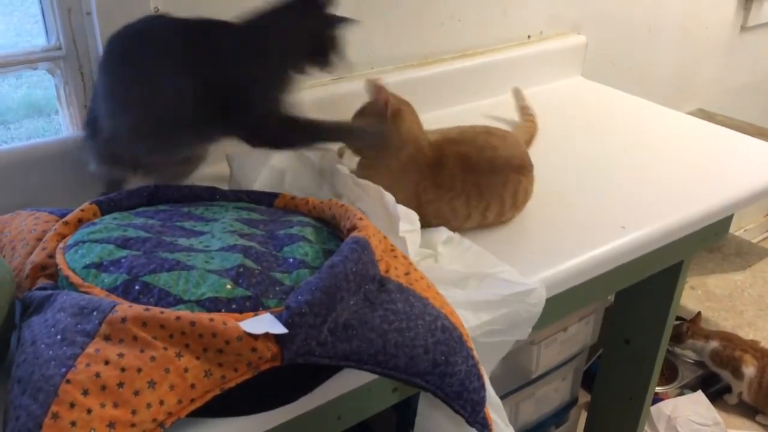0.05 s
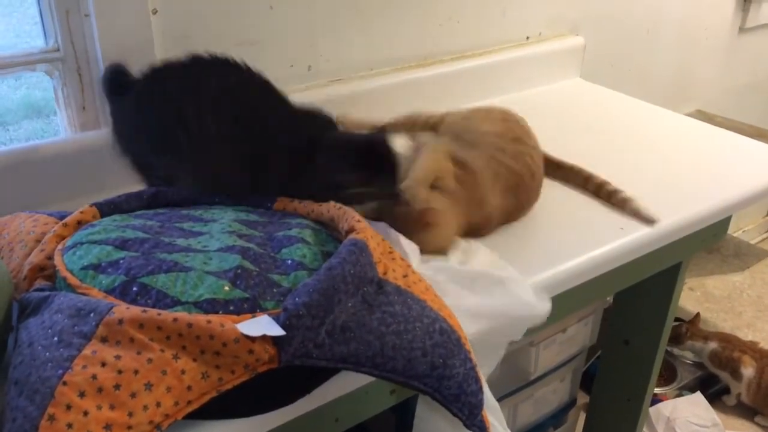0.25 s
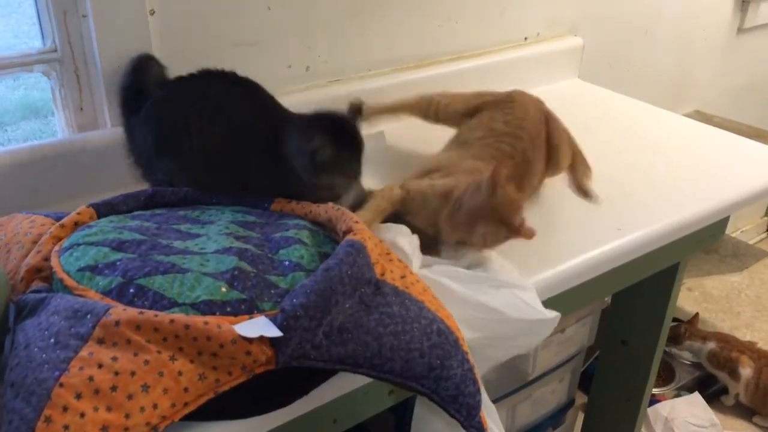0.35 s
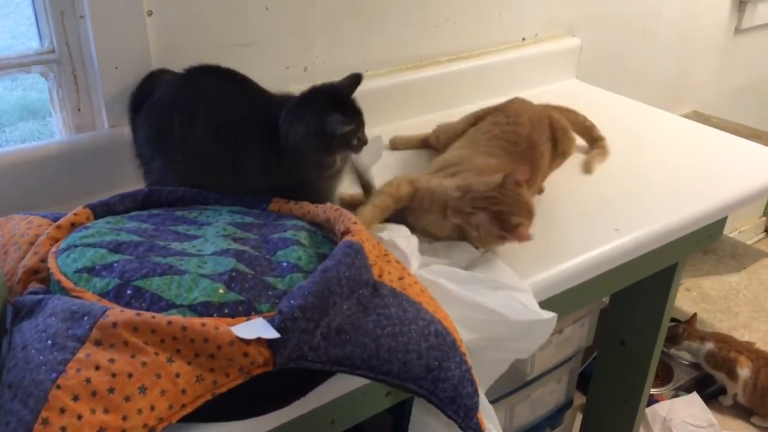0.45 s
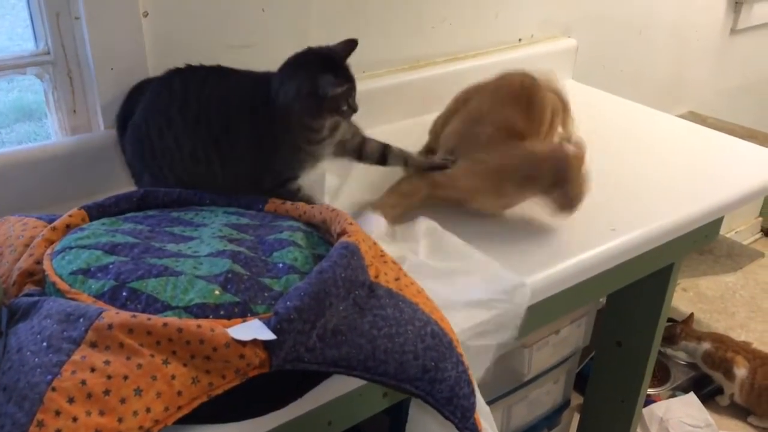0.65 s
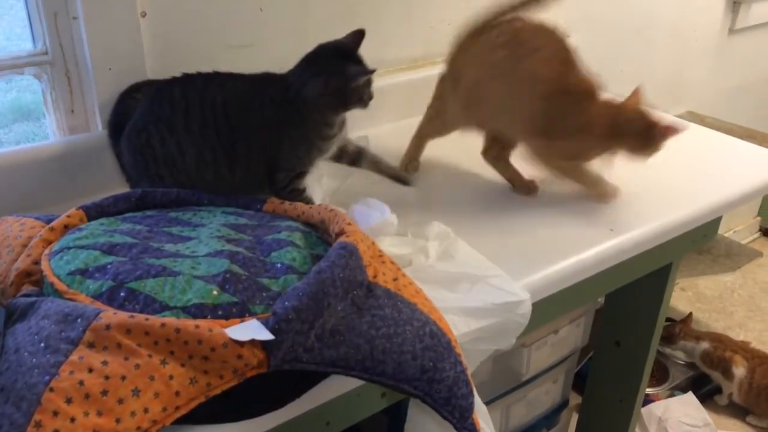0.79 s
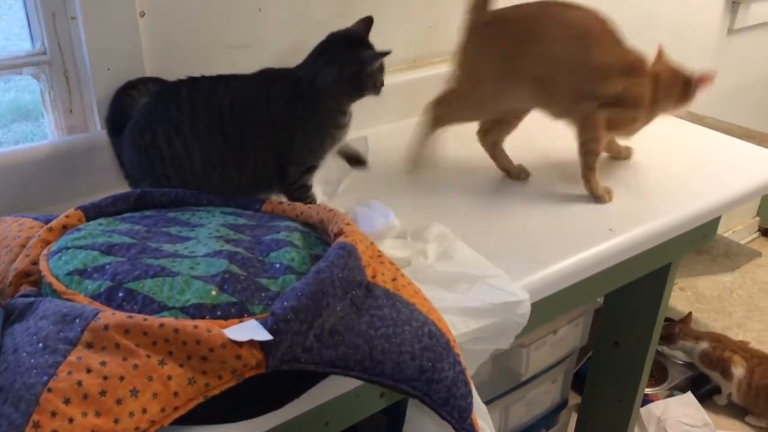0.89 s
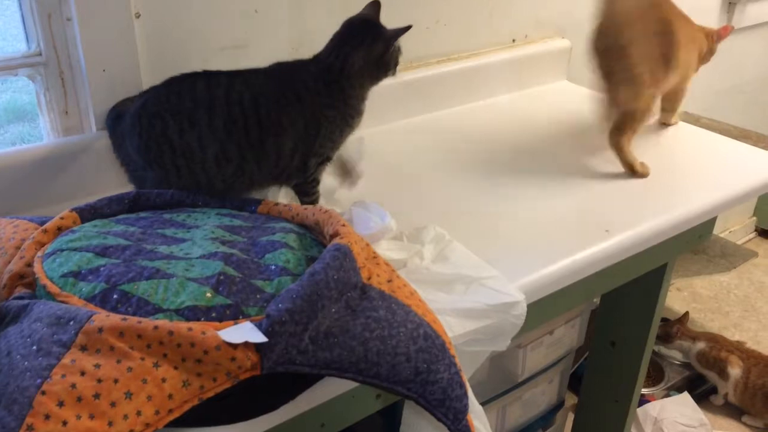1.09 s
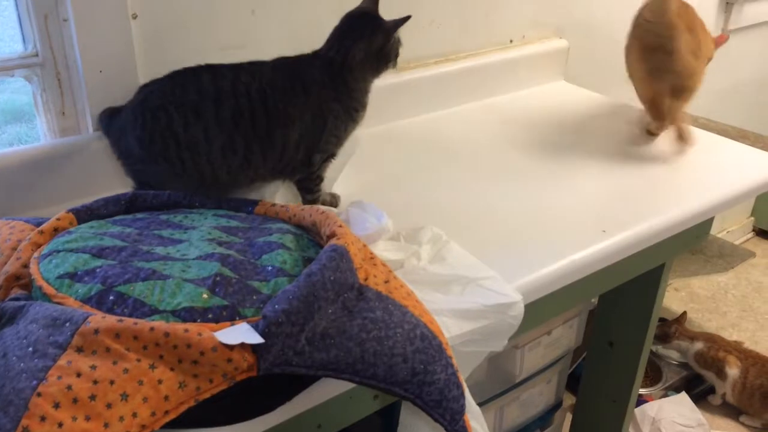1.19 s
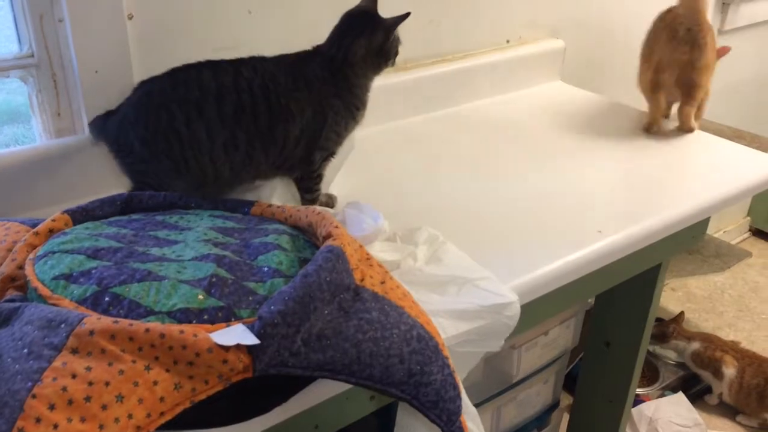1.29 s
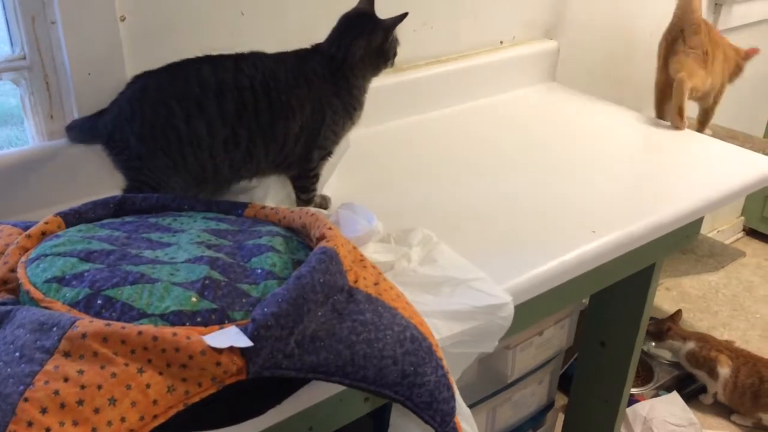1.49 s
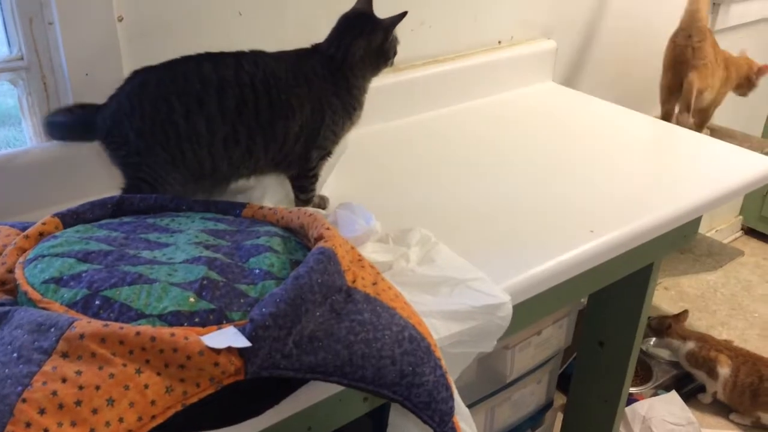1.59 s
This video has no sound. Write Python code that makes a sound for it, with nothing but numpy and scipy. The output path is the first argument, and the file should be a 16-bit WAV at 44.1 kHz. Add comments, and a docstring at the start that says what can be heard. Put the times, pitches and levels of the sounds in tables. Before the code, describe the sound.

Cats scuffling on a hollow counter: soft thumps, paper rustle, claw ticks and retreating paws.

```python
"""Two cats tussle on crumpled paper on a countertop in a small quiet room.
First the paper rustles under them, bodies and paws thump the hollow counter and fur drags over it.
Claws tick on the top, and the paper comes to rest. Then one cat leaps clear and pads away
with soft bumps, a few more ticks and light scuffs, over the faint rumble of the room."""
import sys
import numpy as np
from scipy import signal
from scipy.fft import rfft, irfft
from scipy.io import wavfile

SR = 44100
rng = np.random.default_rng(int(sys.argv[2]) if len(sys.argv) > 2 else 0)


def file_out(sig):
    """Save sig as 16-bit WAV at sys.argv[1]."""
    # one column per channel
    cols = np.atleast_2d(sig).T
    # limit, then scale
    lim = np.clip(cols, -1, 1)
    pcm = np.round(lim * 32767).astype(np.int16)
    wavfile.write(sys.argv[1], SR, pcm)


N = 72765


def thumps():
    """Soft blows set the hollow counter ringing; fur and pads press flat with a dull puff."""
    # bodies and paws land: t/s, level/dB, low edge f/Hz, high edge f/Hz
    blows = [(0.099, -44, 41.3, 109), (0.1293, -41, 380, 920), (0.1744, -41.5, 453, 910),
             (0.213, -42, 280, 480), (0.229, -39.5, 220, 550), (0.240, -25.5, 30, 112),
             (0.254, -22, 30, 125), (0.272, -28, 30, 90), (0.286, -36.5, 30, 118), (0.323, -63.5, 60, 217),
             (0.383, -42, 30, 80.5), (0.443, -32.5, 45.3, 410), (0.452, -35.5, 59.7, 397),
             (0.466, -40, 131, 690), (0.472, -42.5, 50.4, 294), (0.487, -36, 40.2, 122),
             (0.503, -45, 39.55, 100), (0.831, -57, 49, 144), (0.900, -49, 50.3, 160),
             (1.038, -51.5, 60, 336), (1.055, -43, 45, 205), (1.085, -39, 45.5, 84), (1.211, -46, 50, 108),
             (1.255, -56.5, 70.5, 375), (1.285, -48.5, 69, 308), (1.513, -48, 206, 600),
             (1.530, -48, 114, 430), (1.555, -45, 40, 169)]
    # the tones the counter rings with: f/Hz, level/dB, time to fade by 60 dB/s
    tones = [(54.4, -20.5, 0.29), (65.2, -3.5, 0.2), (80.4, -5.5, .16), (112, -7, 0.1), (139.2, -6, 0.033),
             (181, -8, 0.207), (211, -10.5, 0.096), (260, -6.5, 0.044), (321.7, -12.5, 0.067),
             (375.2, -13, 0.28), (551, -11.5, 0.068), (630, -5, 0.0078), (685, -48, .16), (920, -16, 0.067)]
    pushes = np.array([contact(*row) for row in blows])
    strengths = from_db(rng.normal(0, 1, (len(blows), len(tones))))   # no two blows ring quite alike
    body = sum(from_db(db) * ring(strengths[:, k] @ pushes, hz, t60)
               for k, (hz, db, t60) in enumerate(tones))
    body = cut(body, 36.7, "high")   # the microphone drops the deepest bass of the thumps
    noise = cut(rng.standard_normal(N), 100, "high")
    puffs = sum(from_db(db) * swell(start, rise=.0015, t60=0.055) * cut(noise, high_hz)
                for start, db, _, high_hz in blows)
    return body + from_db(-10) * puffs / np.std(cut(noise, 670))


def contact(start, db, low_hz, high_hz):
    """One push on the counter: a soft one lacks treble, a light one lacks bass."""
    push = cut(click(start), high_hz)
    return from_db(db) * cut(push, low_hz, "high", order=1)


def claws():
    """Claws and clutter tap: two tones that die quickly, and a faint bright crack."""
    # each spot has its own pitch: t/s, level/dB, lower f/Hz, upper f/Hz, crack against the tones/dB
    ticks = [(0.4175, -33.5, 1430, 1990, -31), (0.419, -31.5, 1415, 2140, -38),
             (0.4219, -43, 1680, 1900, -41), (0.596, -40, 1610, 2270, -36),
             (0.6935, -40.5, 3340, 6540, -16), (1.095, -49, 1120, 1450, -28),
             (1.4095, -39, 1530, 3460, -22.5), (1.411, -45, 5000, 6650, -16)]
    cycles = 13   # swings until a tone has faded by 60 dB
    out, noise = 0, cut(rng.standard_normal(N), 5010, "high")
    for start, db, lower_hz, upper_hz, crack_db in ticks:
        tap = click(start) + 1e-18
        lower = ring(tap, lower_hz, cycles / lower_hz)
        upper = from_db(-3.5) * ring(tap, upper_hz, cycles / upper_hz)
        crack = from_db(crack_db) * noise * swell(start, rise=.0003, t60=0.012)
        out = out + from_db(db) * (lower - upper + crack)
    return out


def paper():
    """Paper hisses as it slides; its creases snap more often the harder it is crushed."""
    # how hard the paper is rubbed and crushed: t/s, relative level/dB
    rustle = [(0.0, -75.5), (0.034, -70), (0.076, -70), (0.146, -61), (0.208, -64), (0.232, -57),
              (0.334, -60.5), (0.378, -65.5), (0.486, -68.5), (0.534, -58), (0.564, -63), (0.68, -60),
              (0.692, -56), (0.808, -75), (0.86, -73.5)]
    # the tone colour of sliding and snapping paper: f/Hz, relative level/dB
    spectrum = [(120, -34), (200, -0.5), (258, -8), (683, -5), (775, -5.5), (1260, -3.5), (2330, -8.5),
                (2850, -14.5), (3410, -9.5), (3730, -12.5), (6770, -16.5), (15000, -25)]
    settle_db_per_s, peak_snaps_per_s = 52, 2500
    times, db = np.transpose(rustle)
    t = np.arange(N) / SR
    settling_db = settle_db_per_s * np.maximum(t - times[-1], 0)
    effort = from_db(np.interp(t, times, db) - settling_db)
    slide = colour(rng.standard_normal(N), spectrum)
    snaps_per_s = peak_snaps_per_s * np.sqrt(effort / effort.max())
    creases = colour(grains(snaps_per_s, spread_db=3.5), spectrum)
    return effort * (from_db(5) * slide + from_db(-1) * creases)


def fur():
    """Fur drags over the counter with a dull swish as the cats wrestle."""
    # each drag: t/s, level/dB, rise time/s, time to fade by 60 dB/s
    drags = [(0.135, -57, 0.032, 0.24), (0.208, -42.5, 0.013, 0.71), (0.434, -46, 0.0049, 0.27)]
    # the tone colour of rubbing fur: f/Hz, relative level/dB
    spectrum = [(100, 12), (250, 10), (600, -1.5), (1400, -4.5), (2300, -14), (3000, -25), (12000, -51)]
    loudness = sum(from_db(db) * swell(start, rise, t60) for start, db, rise, t60 in drags)
    return loudness * colour(rng.standard_normal(N), spectrum)


def scuffs():
    """Paws slip on the bare top: a fine grainy hiss and a faint rasp with its own pitch."""
    # each scuff: t/s, level/dB, rise time/s, time to fade by 60 dB/s, tilt/(dB per octave), rasp f/Hz
    steps = [(1.036, -57, 0.0078, 0.4, 0, 5550), (1.16, -60, 0.011, 0.23, -0.6, 2400),
             (1.246, -55.5, 0.0043, 0.34, -2.6, 3350), (1.355, -66, .003, 0.023, 3, 6560),
             (1.491, -63.5, 0.017, 0.23, -0.5, 4140), (1.523, -63.5, 0.011, 0.21, 4, 5600),
             (1.581, -63.5, 0.022, 0.78, 4.5, 4970)]
    # the tone colour of a sliding paw pad: f/Hz, relative level/dB
    spectrum = [(150, 3.5), (400, 0), (900, -6.5), (2000, -5.5), (5000, -8.5), (8000, -13.5),
                (15000, -22.5)]
    out, slips = 0, grains(per_s=5000, spread_db=1.5)
    for start, db, rise, t60, tilt, rasp_hz in steps:
        hiss = colour(slips, [(hz, level + tilt * np.log2(hz)) for hz, level in spectrum])
        rasp = from_db(-18) * rms_one(ring(slips, rasp_hz, t60=0.008))
        out = out + from_db(db) * swell(start, rise, t60) * (hiss + rasp)
    return out


def room_echo(x):
    """Quick echoes come off the corner behind the counter, then a short wash off the near walls."""
    delay_s = 0.0014
    noise = cut(cut(rng.standard_normal(N), 6000, order=1), 247, "high")
    early = noise * swell(delay_s, rise=0.0006, t60=0.055)
    late = noise * swell(delay_s, rise=0.014, t60=0.55)
    echoes = from_db(-8) * early / np.linalg.norm(early) + from_db(-13) * late / np.linalg.norm(late)
    return signal.fftconvolve(x, echoes)[:N]


def room_air():
    """The air of the room makes a faint, steady rumble and hiss."""
    # the tone colour of the quiet room: f/Hz, relative level/dB
    spectrum = [(25, -1), (50, 3.5), (80, 5.5), (120, 8.5), (160, -3), (250, -14), (400, -11.5), (800, -19),
                (1600, -19), (2500, -27.5), (5000, -27.5), (10000, -35), (15000, -34)]
    return from_db(-59) * colour(rng.standard_normal(N), spectrum)


def from_db(db):
    """Turn decibels into a number to multiply by."""
    return 10 ** (np.asarray(db) / 20)


def rms_one(x):
    """Scale a sound to an average power of 1."""
    return x / np.sqrt(np.mean(x ** 2) + 1e-20)


def cut(x, hz, kind="low", order=2):
    """Keep what lies below hz ("low") or above it ("high")."""
    sections = signal.butter(order, np.clip(hz, 10, .45 * SR), kind, fs=SR, output="sos")
    return signal.sosfilt(sections, x + 1e-18)


def colour(x, spectrum):
    """Give a sound a smooth tone colour, at a power of 1."""
    hz, db = np.transpose(spectrum)
    f = np.maximum(np.fft.rfftfreq(N, 1 / SR), 1)
    gain = from_db(np.interp(np.log(f), np.log(hz), db))
    shaped = irfft(rfft(x) * gain, N)
    return rms_one(cut(shaped, hz[0], "high"))


def click(start):
    """A single click at start seconds."""
    return 1.0 * (np.arange(N) == int(start * SR))


def grains(per_s, spread_db):
    """Random clicks, many small and few large."""
    sizes = from_db(spread_db * np.minimum(rng.exponential(1, N), 5))
    return sizes * rng.choice([-1, 1], N) * (rng.random(N) < per_s / SR)


def swell(start, rise, t60):
    """A loudness curve that grows for rise seconds, then fades by 60 dB every t60 seconds."""
    t = np.arange(N) / SR - start
    return np.clip(t / rise, 0, 1) * from_db(-60 * np.maximum(t - rise, 0) / t60)


def ring(force, hz, t60):
    """One tone, set ringing by a force, that fades by 60 dB in t60 seconds."""
    decay, angle = from_db(-60 / (t60 * SR)), 2 * np.pi * hz / SR
    return signal.lfilter([0, np.sin(angle)], [1, -2 * decay * np.cos(angle), decay * decay], force)


def scene():
    """Knocks and their echoes, with paper, fur and scuffs over the quiet air."""
    knocks = thumps() + claws()
    air = room_air()
    return (knocks + room_echo(knocks) + paper() + fur() + scuffs() + air)[None]


def record(dry):
    """The microphone drops the deepest rumble; the highest treble is cut steeply."""
    low_hz, high_hz = 30, 15400
    thinned = cut(dry, low_hz, "high")
    return signal.sosfilt(signal.ellip(12, .1, 80, high_hz, fs=SR, output="sos"), thinned)


dry = scene()
out = record(dry)
file_out(out)
```